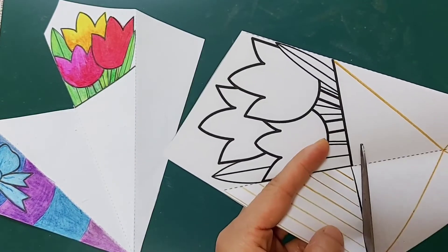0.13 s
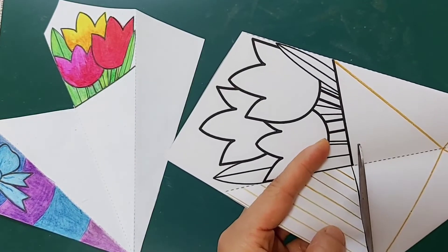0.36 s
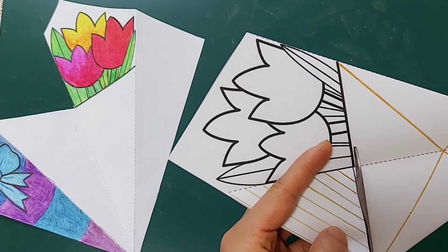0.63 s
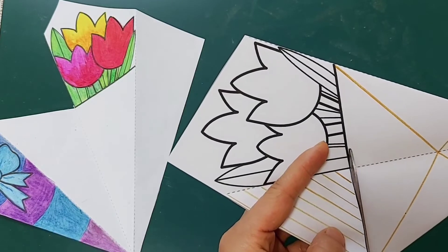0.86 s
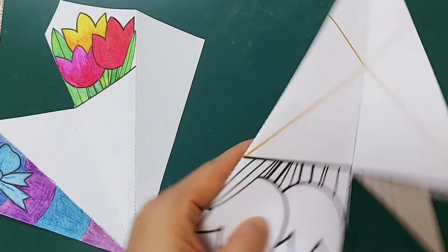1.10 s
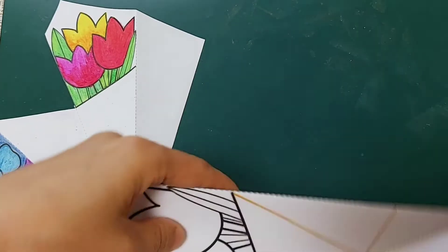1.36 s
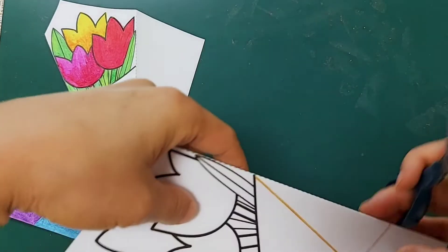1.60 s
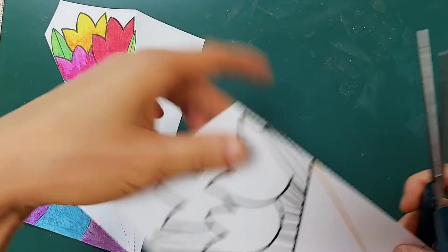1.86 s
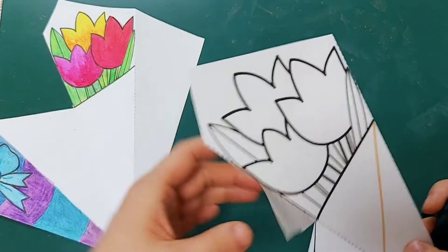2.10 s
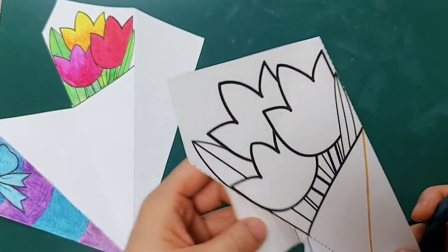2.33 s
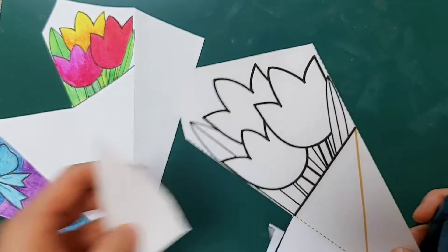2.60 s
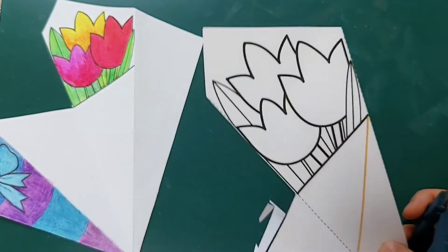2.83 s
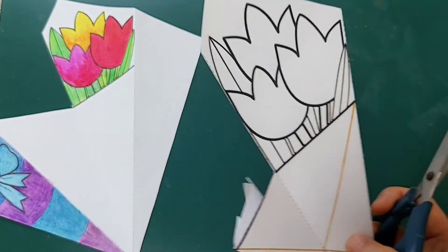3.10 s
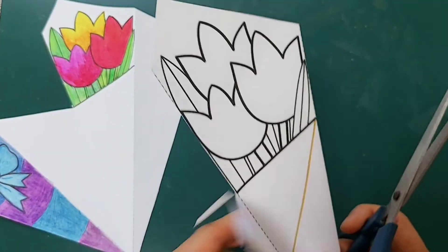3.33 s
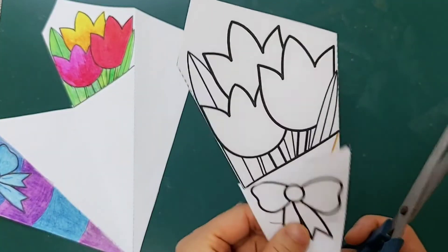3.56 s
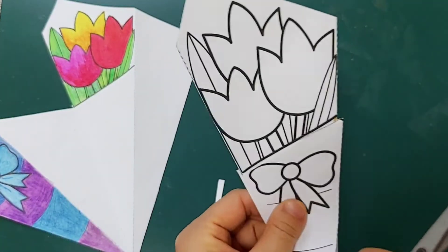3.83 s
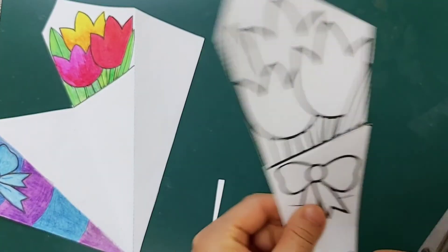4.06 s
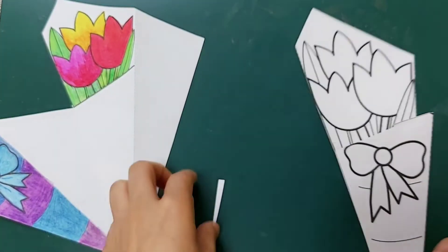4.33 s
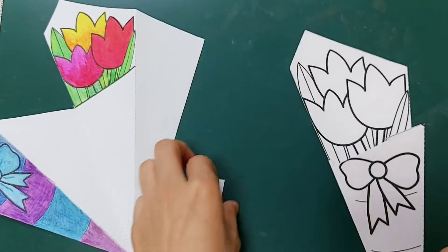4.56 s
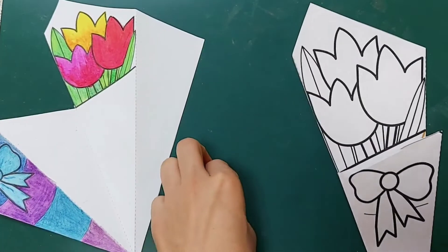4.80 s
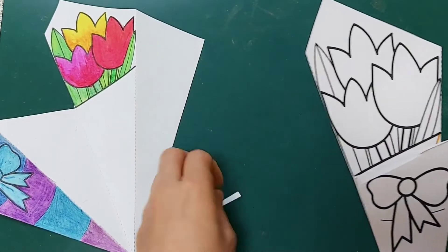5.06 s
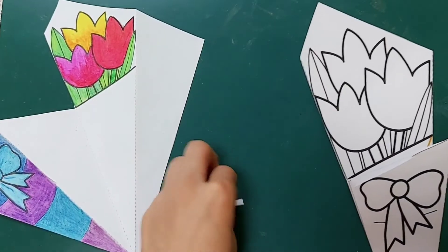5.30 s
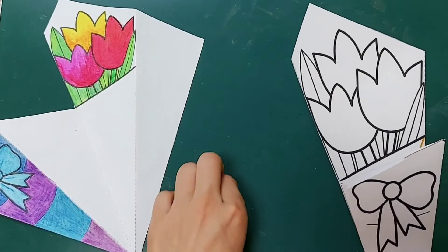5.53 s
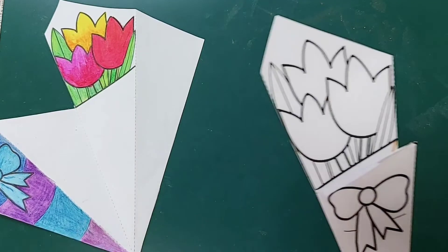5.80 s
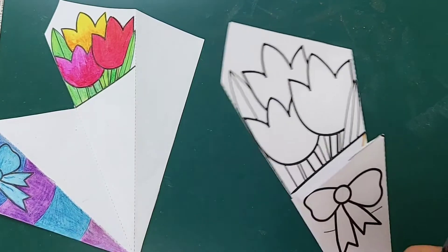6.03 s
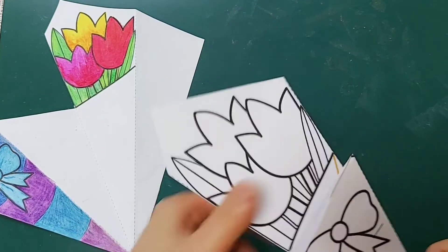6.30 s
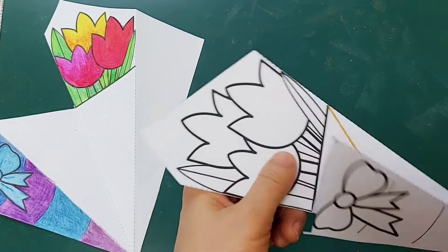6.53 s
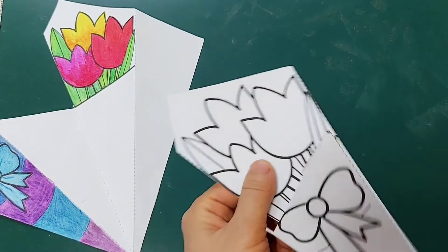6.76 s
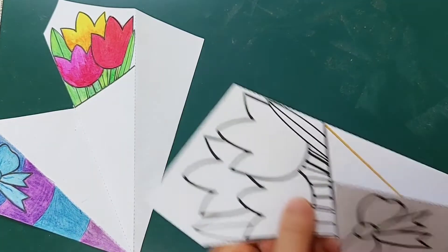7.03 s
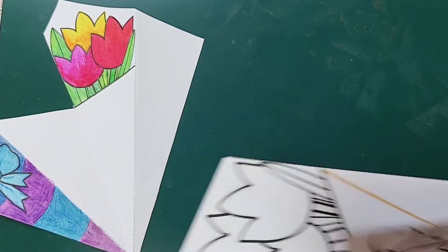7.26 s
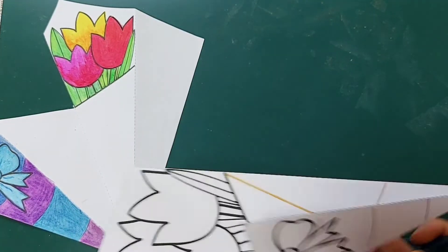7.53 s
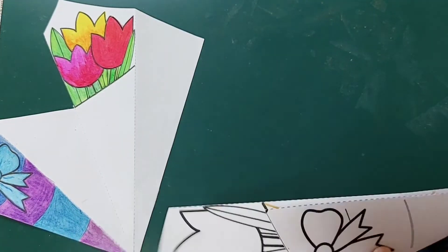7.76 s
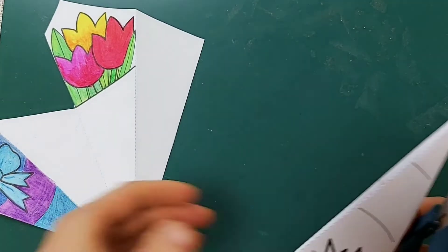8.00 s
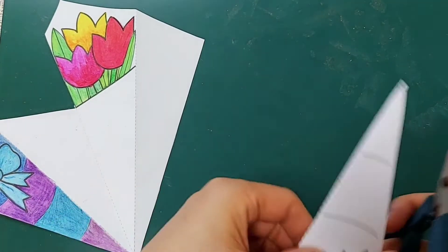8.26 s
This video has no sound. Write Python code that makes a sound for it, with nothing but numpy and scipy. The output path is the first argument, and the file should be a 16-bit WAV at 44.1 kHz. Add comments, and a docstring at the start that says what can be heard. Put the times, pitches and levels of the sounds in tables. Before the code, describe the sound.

In a small quiet room, scissors nibble stiff paper with dry, crisp snips. The sheet is turned and folded, rustling and popping, with a sharp crack near four seconds. Fingers then tap and scrape softly on a mat before the paper returns with louder snaps and crinkles. The close stereo microphone favours the left, over faint hiss and low rumble.

```python
"""In a quiet small room, close above a cutting mat, scissors nibble through stiff paper in short slips.
The sheet is turned, folded and slid, snapping as creases buckle; fingers tap and drag a scrap over the mat.
Gritty friction noise and sharp pushes drive resonators for sheet and mat; stiff folds pop, sliding edges
whistle and air under the curled sheet rings. Decaying noise gives the room's echoes; a wavering low rumble,
faint hiss and a thin high tone lie beneath. All sound drops out once for an instant."""
import sys
import numpy as np
from scipy import signal
from scipy.fft import rfft, irfft, next_fast_len
from scipy.io import wavfile
from scipy.ndimage import uniform_filter1d, map_coordinates

SR = 44100
rng = np.random.default_rng(int(sys.argv[2]) if len(sys.argv) > 2 else 0)


def master_out(mix):
    """Clip the mix to full scale and print it as 16-bit PCM to the path in sys.argv[1]."""
    frames = np.transpose(np.atleast_2d(mix))
    ceiling = np.clip(frames, -1, 1)
    pcm = np.round(ceiling * 32767).astype(np.int16)
    wavfile.write(sys.argv[1], SR, pcm)


def ratio_of_db(decibels):
    """Turn decibels (scalar or array-like) into linear amplitude factors; 0 dB maps to 1."""
    return 10 ** (np.asarray(decibels, float) / 20)


N = 369602  # length [samples]

PAPER_LEFT_DB = 4  # left over right [dB]: the hands work nearer the left port


def level(x, db=0):
    """Normalisation: scale a signal to an rms level in dB."""
    return x * ratio_of_db(db) / np.sqrt(np.mean(x ** 2))


def curve(points):
    """Linear interpolation of (time [s], level [dB]) points over the scene; silent outside their span."""
    s, db = np.transpose(points)
    return np.interp(np.arange(N) / SR, s, db, left=-150, right=-150)


def ring(x, modes):
    """Modal superposition: band-pass resonances (Hz, width Hz, dB), each applied twice for steep skirts."""
    out = 0
    for hz, width, db in modes:
        b, a = signal.iirpeak(hz, hz / (1.892 * width), SR)  # the double pass narrows the peak again
        out = out + ratio_of_db(db) * signal.lfilter(b, a, signal.lfilter(b, a, x))
    return out


def colour(x, points):
    """Spectral shaping: weight the Fourier spectrum by (Hz, dB) points joined over log frequency."""
    hz, db = np.transpose(points)
    size = next_fast_len(x.shape[-1])
    f = np.fft.rfftfreq(size, 1 / SR) + 1
    gain = ratio_of_db(np.interp(np.log(f), np.log(hz), db))
    return irfft(rfft(x, size) * gain, size)[..., :x.shape[-1]]


def walk(rate):
    """Slow random modulation: random values held 1 / rate s, then smoothed twice."""
    hold = int(SR / rate)
    steps = np.repeat(rng.standard_normal(N // hold + 1), hold)
    return 1.13 * uniform_filter1d(uniform_filter1d(steps, hold), hold)[:N]


def pair(likeness):
    """Interchannel coherence: left and right noise sharing a middle part, with an opposed side part."""
    mid, side = rng.standard_normal((2, N))
    opposed = side * np.array([[1], [-1]])
    return np.sqrt((1 + likeness) / 2) * mid + np.sqrt((1 - likeness) / 2) * opposed


def grit(likeness, spread_db, rate):
    """Stick-slip roughness: noise broken into uneven grains by quick level changes."""
    return level(pair(likeness) * ratio_of_db(spread_db * walk(rate)))


def sides(db):
    """Level panning: gains of the left and right channel for a difference in dB."""
    return ratio_of_db(np.array([[db / 2], [-db / 2]]))


def blows(times, db, decay_s):
    """Impulsive excitation: a sudden rise at each time, then an exponential fall."""
    kick = np.full(N, 1e-18)
    np.add.at(kick, (np.asarray(times) * SR).astype(int), ratio_of_db(db))
    return signal.lfilter([1], [1, -np.exp(-1 / (decay_s * SR))], kick)


def tears(times, db, rise_s):
    """Progressive fracture: an envelope that swells to its peak at the rise time, then dies away."""
    t = np.arange(SR // 20) / SR
    return signal.fftconvolve(blows(times, db, 1e-6), t / rise_s * np.exp(1 - t / rise_s))[:N]


def strokes(start, length, db, rise, fall):
    """Energy addition: strokes rise, hold and fall at rates in dB per s; their powers add."""
    t = np.arange(0, N / SR + .001, .0005)[:, None]  # coarse time grid [s]
    off = np.maximum(rise * (start - t), 0) + np.maximum(fall * (t - start - length), 0)
    return np.interp(np.arange(N) / SR, t[:, 0], np.sqrt(np.sum(ratio_of_db(db - off) ** 2, axis=1)))


def shake(shape, likeness, spread_db, rub, jolt, push):
    """Forced vibration: gritty friction and sharp pushes drive a body; gain 1 for steady noise and a lone push."""
    answer = shape(signal.unit_impulse(SR // 5))
    noise = grit(likeness, spread_db, 350) * (rub + jolt) / np.sqrt(np.sum(answer ** 2))
    return shape(noise + push / np.max(np.abs(answer)))


def background():
    """Stationary ambient noise: a narrow wavering rumble, broad hiss and one steady high tone."""
    # the rumble swells: (start [s], length [s], level [dB])
    swells = [(2.409, 0.19, -56.5), (4.462, 0.079, -65.5), (5.17, 0.092, -61.5), (5.6, 0.27, -63),
              (6.476, 0.041, -57.5), (6.916, 0.029, -57), (7.454, 0.16, -58.5), (7.798, 0.07, -61.5),
              (8.323, 0.046, -64)]
    # spectrum of the hiss: (frequency [Hz], relative level [dB per Hz])
    air = [(59, -21), (100, -0.5), (156, -8), (234, -8), (406, -17), (570, -18), (6150, -30), (14400, -26),
           (16000, -31.5)]
    rumble_modes = [(65.2, 14, 7.5), (87.0, 18, -12.0), (41.4, 18, -11.0)]  # (Hz, width Hz, dB)
    rest_db, rise, fall = -73, 100, 120  # dB between swells; dB per s
    rumble = level(ring(pair(0.79), rumble_modes))
    rumble = rumble * np.hypot(ratio_of_db(rest_db), strokes(*np.transpose(swells), rise, fall))
    tone_hz, tone_db = 14061, -90
    tone = ratio_of_db(tone_db) * np.sqrt(2) * np.sin(2 * np.pi * tone_hz * np.arange(N) / SR)
    hiss = level(colour(pair(0.1), air), -75)
    return (rumble + hiss + tone) * sides(4.05)


def room(x):
    """Diffuse reverberation: a decaying cloud of echoes, its own for each channel and duller than the source."""
    t60_s, room_db = 0.23, -11
    t = np.arange(SR // 2) / SR
    echoes = rng.standard_normal((2, len(t))) * np.exp(-np.log(1000) * t / t60_s) * (t > .004)
    echoes = signal.lfilter([1], [1, -.4], echoes)
    echoes /= np.sqrt(np.sum(echoes ** 2, axis=1, keepdims=True))
    return ratio_of_db(room_db) * signal.fftconvolve(x, echoes, axes=1)[:, :N]


def dragging(tilt, fall):
    """Sliding friction: how hard the fingers drive one layer of the mat, by its share of the brightness."""
    # fingers drag over the mat: (start [s], length [s], level [dB], brightness [dB], rise [dB per s])
    drags = [(4.456, 0.038, -59.5, -7, 2000), (4.556, 0.14, -64.5, -32, 201.5),
             (4.746, 0.086, -65, -9, 300), (4.884, 0.028, -68, -18, 302), (5.052, 0.016, -68.5, -3, 204),
             (5.289, 0.041, -62, -32.5, 1498.5), (5.358, 0.025, -58.5, -3, 400),
             (5.515, 0.057, -71, -26, 603), (5.648, 0.0051, -65.5, 8, 404),
             (5.911, 0.022, -99.5, 34.5, 197), (6.336, 0.023, -100, 39, 2002)]
    s, length, db, bright, rise = np.transpose(drags)
    return strokes(s, length, db + tilt * bright, rise, fall)


def fingers():
    """Cavity and plate resonance: taps and drags ring the hollow under a cupped hand and thud in the mat."""
    # fingertips and nails meet the mat: (time [s], level [dB], tick share [dB], thud share [dB])
    taps = [(4.449, -36, -28, -16.5), (4.461, -46, -36, -16), (4.529, -43.5, -39, -47),
            (4.725, -59, -9.5, -14), (4.772, -65, 4, -31), (4.82, -48.5, 4.5, -34.5),
            (4.898, -47, -28, -35), (5.013, -53.5, -16, -38), (5.055, -46, -24.5, -48),
            (5.287, -47, -18.5, -9.5), (5.621, -50, -34, -20)]
    # resonances under the cupped hand: (frequency [Hz], width [Hz], level [dB])
    hollow = [(882, 125, 13), (1073, 210, -2.5)]
    # resonances of a scraping finger: (frequency [Hz], width [Hz], level [dB])
    scrape_modes = [(1347, 380, 12.5), (2300, 760, -3), (3420, 1300, -4)]
    # low resonance of the mat: (frequency [Hz], width [Hz], level [dB])
    thud_modes = [(195, 46, 0)]
    # the mat under a nail: (frequency [Hz], width [Hz], level [dB])
    knock_modes = [(376, 58, 11)]
    # spectrum of fingertip hiss: (frequency [Hz], level [dB per Hz])
    skin = [(3000, -21.5), (7000, -4), (11000, -3.5), (16000, -3.5)]
    # brightness share; fall [dB per s]
    rub, scrape, hiss = dragging(0, 183), dragging(0.43, 294), dragging(0.94, 180)
    s, peak, tick, thud = np.transpose(taps)
    out = shake(lambda x: ring(x, hollow), 0.17, 2.6, rub,
                blows(s, peak - 8, 0.0094), blows(s, peak - 4, 1e-6))
    tick_noise = blows(s, peak + tick + 3, 0.0027) + blows(s, peak + tick - 9, 0.02)
    # neighbouring scrape resonances have opposite sign
    out += shake(lambda x: ring(x, scrape_modes[::2]) - ring(x, scrape_modes[1::2]), 0.33, 4.2,
                 scrape, tick_noise, blows(s, peak + tick - 2, 1e-6))
    out += shake(lambda x: ring(x, thud_modes), 0.95, 2.8, 0, blows(s, peak + thud, 0.035), 0)
    out += shake(lambda x: ring(x, knock_modes), 0.89, 5.7, 0, blows(s, peak + tick - 14, 0.029), 0)
    out += shake(lambda x: colour(x, skin), 1.0, 5.3, hiss, 0, 0)
    return out * sides(5.5)  # the free hand is further left


def whistles():
    """Friction-excited resonance: a sliding edge whistles as gritty noise narrowed to one band."""
    # whistling slides: (start [s], length [s], frequency [Hz], level [dB])
    slips = [(1.116, 0.054, 9900, -55.5), (3.65, 0.034, 8150, -58), (3.705, 0.026, 3550, -63),
             (3.725, .02, 2450, -57), (4.15, 0.012, 5830, -52)]
    width_share, fade = .06, 600  # share of the pitch; dB per s
    rub = grit(0.6, 3.0, 430)
    out = 0
    for s, length, hz, db in slips:
        band = level(ring(rub, [(hz, width_share * hz, 0)]))
        out = out + band * strokes(np.array([s]), length, db, fade, fade)
    return out * sides(PAPER_LEFT_DB)


def pops():
    """Snap-through buckling: each stiff fold gives one push that rings briefly, with an echo from the mat."""
    # dry cracks of a fold: (time [s], level [dB], pitch [Hz], width [share of pitch])
    folds = [(0.2943, -41, 298, 0.26), (0.704, -30, 1060, .15), (0.777, -30, 946, 0.092),
             (0.9231, -22.5, 980, 0.3), (1.1455, -51, 640, 0.087), (1.2596, -26.5, 2300, 0.5),
             (2.346, -33.5, 990, 0.56), (2.748, -25.5, 4940, 1.06), (3.7449, -40.5, 1500, .6),
             (3.7748, -30, 4970, 0.26), (3.8283, -35, 1170, 0.12), (3.99, -28, 1296, 0.49),
             (4.0443, -10, 4070, 0.59), (4.0440, -22.5, 1280, 0.44), (6.5025, -31, 2230, 0.68),
             (7.4957, -22.5, 1510, 0.4)]
    echo_s, echo_db = 0.00054, -12.5
    out, click = np.zeros(N), signal.unit_impulse(SR // 10)
    for s, db, hz, width in folds:
        unit = np.max(np.abs(ring(click, [(hz, width * hz, 0)])))
        answer = ring(click, [(hz, width * hz, db)]) / unit
        start = int(s * SR)
        out[start:start + len(click)] -= answer + ratio_of_db(echo_db) * np.roll(answer, int(echo_s * SR))
    return out * sides(PAPER_LEFT_DB)


def handling(db, tilt):
    """Friction drive of one sheet layer: the tilt sets how far bright strokes favour it over dull ones."""
    # a jolt leaves the sheet shuddering: (time [s], level [dB], brightness [dB], fall [dB per s])
    shudders = [(0.294, -45.5, 2.5, 236), (0.703, -52, 6, 494), (0.779, -53, 0, 250), (0.93, -56.5, 1, 120),
                (1.146, -63, 6, 68), (1.263, -56.5, 0.5, 151), (1.689, -61.5, -1, 92),
                (2.352, -55, -2, 121), (2.531, -47, -2, 216), (2.758, -62, 4, 190), (3.401, -51, 0, 127),
                (3.83, -48.5, 2, 224), (4.05, -54, 0.5, 140.5), (6.494, -52.5, -3.5, 139),
                (6.674, -46, 0.5, 115), (6.783, -45.5, 2.5, 89.5), (7.262, -50.5, 4, 82),
                (7.46, -44.5, 1, 130), (7.751, -51.5, 1, 133), (7.929, -50.5, -1, 219.5),
                (8.274, -73.5, 12.5, 105)]
    # blades or fingers slide along the sheet: (start [s], length [s], level [dB], brightness [dB])
    slides = [(0.0, 0.046, -50.5, 3.5), (0.418, 0.011, -66, -1.5), (0.468, 0.054, -63.5, -2),
              (0.553, 0.093, -64, 1), (1.105, 0.082, -66.5, 7), (1.366, 0.024, -67, 6.5),
              (1.548, 0.1, -70, 8.5), (1.724, 0.027, -59.5, 4), (1.847, 0.012, -60, 8.5),
              (2.288, 0.067, -59, 4), (2.499, 0.038, -57, 4.5), (3.012, 0.014, -91.5, 18),
              (3.594, 0.11, -65.5, 5), (3.725, 0.11, -58.5, 6), (3.981, 0.0077, -58, 4),
              (4.017, 0.0055, -54.5, -2), (4.151, 0.012, -59.5, 9), (4.197, 0.013, -66, 12.5),
              (6.483, 0.077, -62.5, 4.5), (6.641, 0.031, -50, 4.5), (6.834, 0.027, -42.5, 2),
              (6.912, 0.029, -66, 7), (7.33, 0.031, -59, 11), (7.374, 0.0064, -55, 12.5),
              (7.508, 0.061, -52.5, -2.5), (7.738, 0.012, -56.5, 1), (7.839, 0.062, -58.5, 5.5),
              (8.291, 0.097, -97.5, 32)]
    s, peak, bright, fall = np.transpose(shudders)
    shudder = strokes(s, 0, peak + db + tilt * bright, 3993.5, fall)
    s, length, peak, bright = np.transpose(slides)
    return np.hypot(shudder, strokes(s, length, peak + db + tilt * bright, 302.5, 332))


def patchy(x, spread_db):
    """Shifting radiation bands: the hiss gathers in bands that wax and wane as the sheet bends."""
    out = 0
    for hz in 4000 * 2 ** np.arange(0, 2.4, 1 / 3):  # third-octave steps
        out = out + ring(x, [(hz, hz / 4, 0)]) * ratio_of_db(spread_db * walk(25))
    return out


def paper():
    """Bending vibration: rubbing, snaps and flutter shake one sheet's flap, drumming, rasp and surface hiss."""
    # fibres part and creases buckle: (time [s], level [dB], drumming share [dB], crack share [dB])
    snaps = [(0.292, -24, -17, -5), (0.373, -56, 7, -15), (0.407, -49.5, 0, -7), (0.457, -38.5, -6, -14),
             (0.545, -34.5, -6.5, -4), (0.582, -42, -4.5, 3), (0.611, -37.5, -11, -15),
             (0.632, -41, -12, -7), (0.679, -48.5, 10.5, 9.5), (0.7, -35.5, -0.5, -20),
             (0.713, -44.5, 6, -28.5), (0.777, -33, -5, -5), (0.809, -44, -6, -10), (0.849, -32, -11, -7.5),
             (0.886, -43.5, -10, -11), (0.922, -34.5, -2, -35), (0.971, -25.5, -13.5, -12),
             (1.007, -27.5, -8.5, -8), (1.259, -24.5, -14.5, -3), (1.679, -43.5, -6.5, -30),
             (1.769, -38, -13.5, -13), (2.191, -53, -8.5, -11), (2.229, -55.5, -3.5, 8.5),
             (2.27, -42, -49, -1), (2.286, -43, -12, -11), (2.345, -32.5, -9, -15.5),
             (2.487, -40.5, -28, 8.5), (2.524, -22, -9.5, -1), (2.747, -36.5, -16.5, -12),
             (3.406, -45.5, 10, -38), (3.468, -33.5, -10.5, -13), (3.567, -42.5, -36, -1),
             (3.711, -44, -4, -26), (3.742, -42, -8, -15), (3.774, -35, -24, -6), (3.825, -32, -17, -16.5),
             (3.989, -26, -8, -5), (4.03, -38, -29, -2), (4.043, -24.5, -6.5, -6.5), (4.08, -34, -29.5, -9),
             (4.156, -43.5, -23, 4.5), (4.225, -54, -15, 4.5), (6.437, -65, -11, 13.5),
             (6.458, -47.5, -5.5, -6.5), (6.484, -19, -10.5, -45.5), (6.501, -14, -17.5, -55.5),
             (6.617, -31, -14, -7), (6.672, -12, -19.5, -28), (6.775, -14.5, -9.5, -46),
             (6.963, -50, 13.5, -30), (7.066, -48, -0.5, -3.5), (7.254, -43.5, -11, 9),
             (7.533, -45, 8, -31), (7.616, -24, -9, -38), (7.701, -51, -24, 8.5), (7.735, -41, -23, -6),
             (7.746, -25, -14, -10), (7.798, -35.5, -6, -30.5), (7.923, -22, -38, -5.5),
             (8.267, -59.5, -13, 7.5)]
    # drumming resonances of the sheet: (frequency [Hz], width [Hz], level [dB])
    sheet = [(872, 280, 4), (1053, 300, 4)]
    # deep flapping resonances: (frequency [Hz], width [Hz], level [dB])
    flap = [(197, 190, -4.5), (463, 252, 2.5)]
    # rasp resonances, the low one first: (frequency [Hz], width [Hz], level [dB])
    rasp_modes = [(2233, 670, 5.5), (3060, 660, 3), (3640, 4800, -3.5)]
    # spectrum of the surface hiss: (frequency [Hz], level [dB per Hz])
    surface = [(2060, -34), (3500, -6.5), (5710, 2.5), (10300, -3), (14800, -8.5), (16000, -21)]
    # how loosely the sheet hangs: (time [s], deep flap against drumming [dB])
    looseness = [(0, -15.5), (.3, 3.5), (.6, -6), (1, -7.5), (1.3, 4.5), (1.7, 1), (2.3, -0.5), (2.6, 5),
                 (3.4, -4), (3.7, -3.5), (4.1, -13.5), (6.5, -1.5), (6.9, -6.5), (7.3, 2.5), (7.6, -1),
                 (8, -1), (8.4, 19)]
    # how tightly the sheet is bent: (time [s], tilt from low rasp to high rasp [dB])
    tightness = [(0, -11.5), (.4, -6.5), (1, -6), (1.3, -8), (1.8, -1), (2.4, -0.5), (2.75, 3.5),
                 (3.5, -6.5), (3.8, 14.5), (4.1, 8), (6.5, -7.5), (6.9, 1.5), (7.4, -2.5), (7.6, -5.5),
                 (8, 4), (8.4, -4)]
    drum, rasp, hiss = handling(0, -1.51), handling(-2, 0.14), handling(0, 0.85)
    slack, taut = ratio_of_db(curve(looseness)), ratio_of_db(curve(tightness) / 2)
    s, peak, low, high = np.transpose(snaps)

    def snap(db, tear_db, flutter_db):
        """Fracture impulse: a burst of tearing with a brief flutter, and one hard push."""
        burst = tears(s, db + tear_db, 0.0015) + blows(s, db + flutter_db, 0.0005)
        return burst, blows(s + 0.0006, db - 1.0, 1e-6)

    # small random creases crackle wherever the surface is rubbed
    crackle_per_s, crackle_db, crackle_spread_db = 140, -1, 3
    size = ratio_of_db(crackle_db + crackle_spread_db * np.minimum(rng.exponential(size=N), 3))
    crackle = (rng.random(N) < crackle_per_s / SR) * size * rng.choice([-1, 1], size=N)

    jolt, push = snap(peak + low - 2, -2.7, -22.0)
    out = shake(lambda x: ring(x, sheet), 0.95, 4.0, drum, jolt, push + 0.76 * crackle * drum)
    out += shake(lambda x: ring(x, flap), 0.99, 3.2, slack * drum, slack * jolt, slack * push)
    jolt, push = snap(peak - 8, -8.0, -21.0)
    for modes, share in ((rasp_modes[:1], 0.74 / taut), (rasp_modes[1:], 0.71 * taut)):
        out += share * shake(lambda x: ring(x, modes), 0.4, 2.4, rasp, jolt, push + 1.8 * crackle * rasp)
    jolt, push = snap(peak + high + 3, -11, -24.0)
    bright = shake(lambda x: colour(x, surface), 0.36, 2.8, hiss, jolt, push + 1.4 * crackle * hiss)
    return (out + 1.505 * patchy(bright, 2.9)) * sides(PAPER_LEFT_DB)


def pockets(x):
    """Air-cavity resonance: bands below and above four harmonics flicker while the curled sheet holds air."""
    # pockets of air under the curl: (start [s], length [s], pitch [Hz], ring [dB])
    cavities = [(.4, .64, 540, -5), (3.69, .2, 1185, -8)]
    width, shift_share, muffle = .22, .12, 0.27  # shares of the pitch; share of the open sound hidden
    out = x
    for start, length, hz, db in cavities:
        held = strokes(np.array([start]), length, 0, 1000, 1000)
        rung = 0
        for k in range(1, 5):
            for shift in (-shift_share, shift_share):
                band = ring(x, [((k + shift) * hz, width * hz, db)])
                rung = rung + band * ratio_of_db(3 * walk(30))
        out = out + held * (rung - muffle * x)
    return out


def over_mat(x):
    """Destructive interference: the reflection from the mat below thins one band."""
    dip_hz, dip_width_hz, dip_share = 1657, 260, 0.49
    return x - dip_share * ring(x, [(dip_hz, dip_width_hz, 0)])


def scene():
    """Superposition: hands and paper, their echoes and the background."""
    near = over_mat(pockets(paper()) + pops() + whistles()) + fingers()
    lag_s = 7e-5 * walk(3)  # lag between the two ports wanders as the hands move
    near[0] = map_coordinates(near[0], [np.arange(N) - lag_s * SR], order=2)
    return near + room(near) + background()


def top_cut(x):
    """Nothing passes above the cut-off."""
    return signal.sosfilt(signal.butter(12, 16990, fs=SR, output="sos"), x)


def record(dry):
    """Gating and low-pass filtering: the sound drops out briefly, then the recorder cuts the top."""
    # all sound drops out for a moment: (start [s], end [s])
    dropout = (1.063, 1.074)
    t = np.arange(N) / SR
    gate = uniform_filter1d(1. * ((t < dropout[0]) | (t > dropout[1])), size=88)
    top_hz = 15900
    low_pass = signal.ellip(8, .2, 25, top_hz, fs=SR, output="sos")
    mix = signal.sosfilt(low_pass, dry * gate)
    return top_cut(mix)


dry = scene()
out = record(dry)
master_out(out)
```